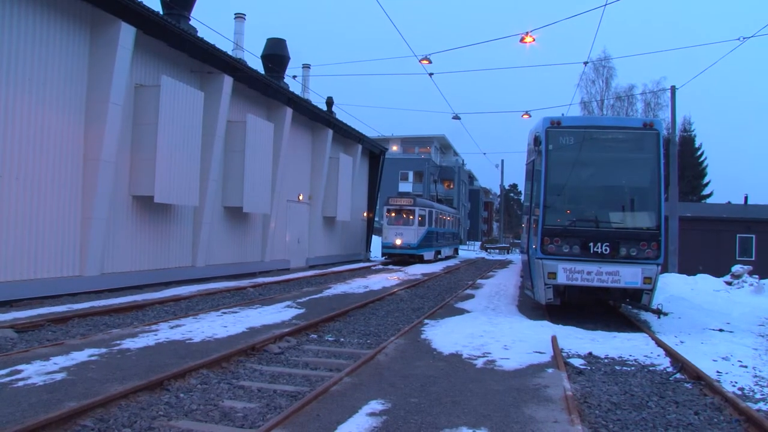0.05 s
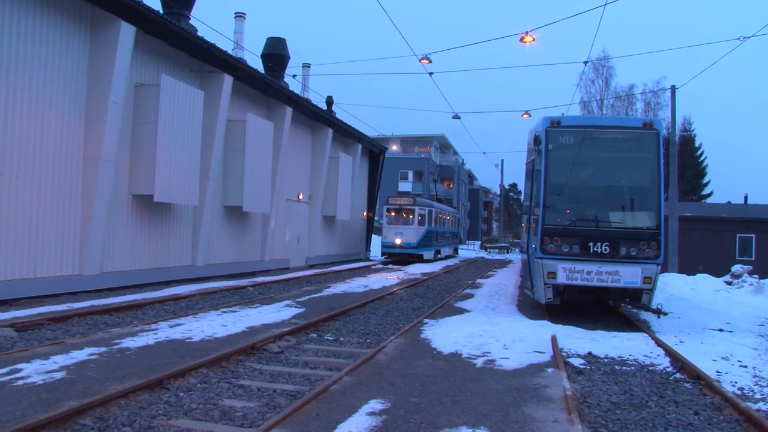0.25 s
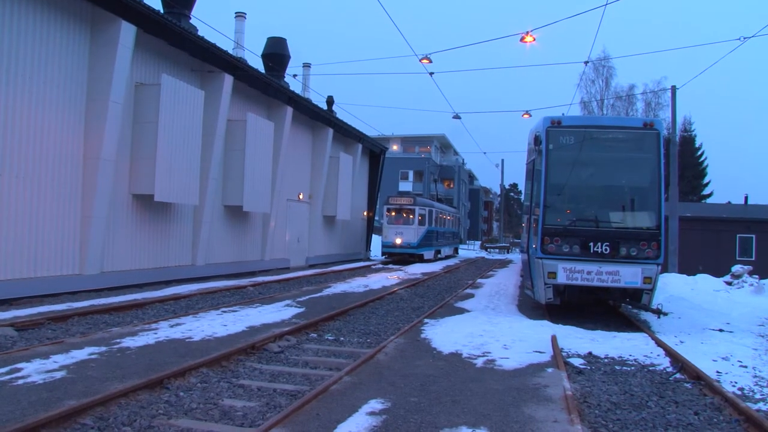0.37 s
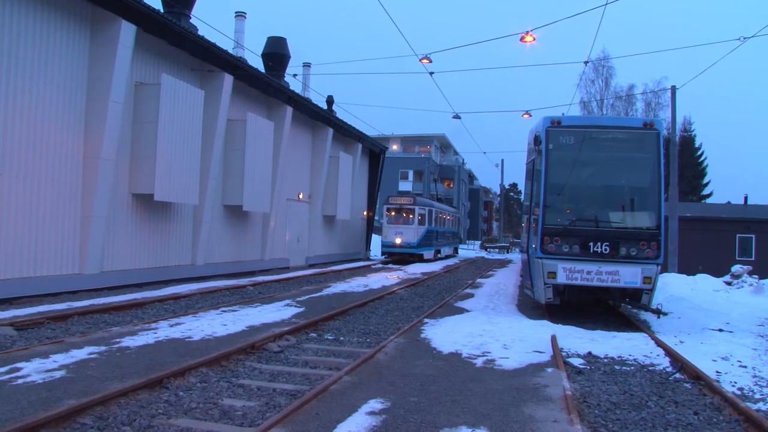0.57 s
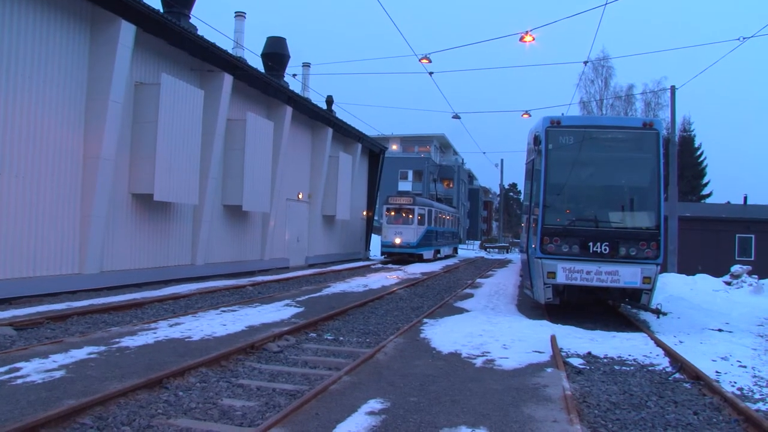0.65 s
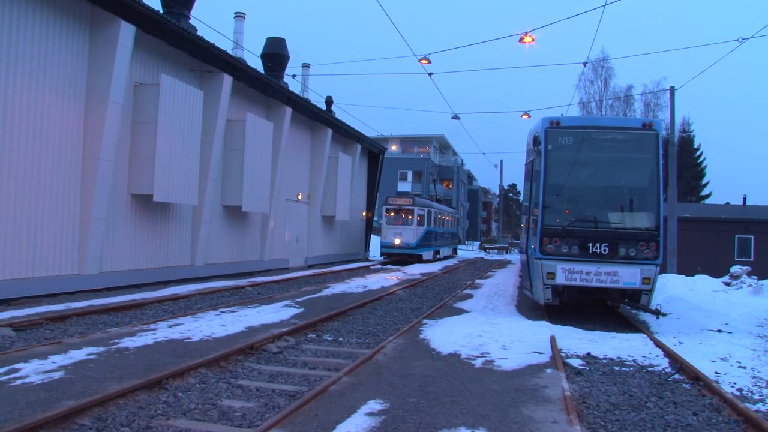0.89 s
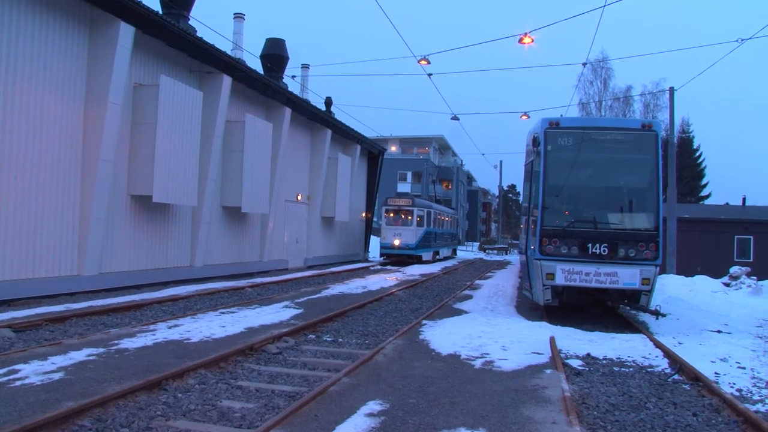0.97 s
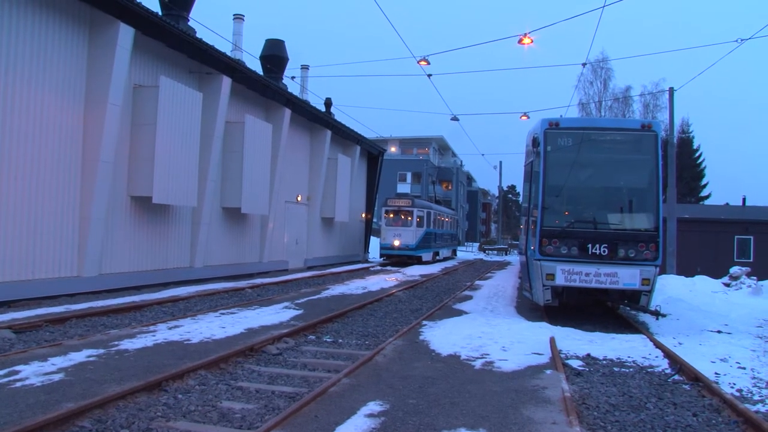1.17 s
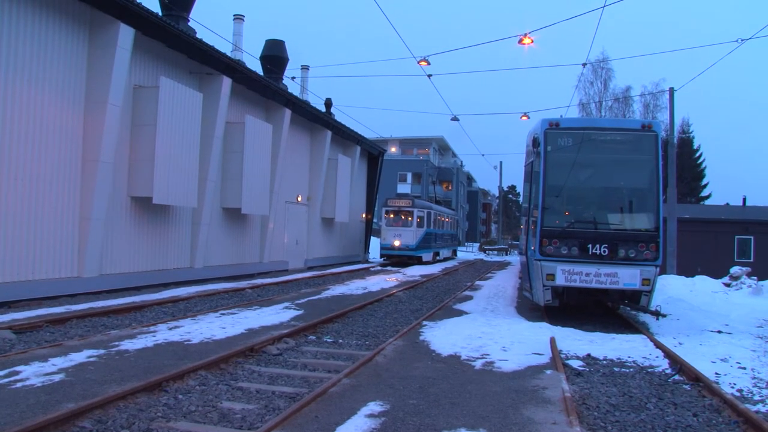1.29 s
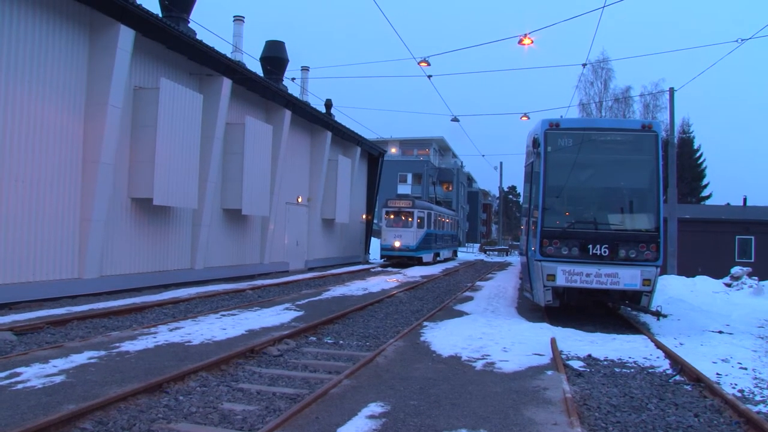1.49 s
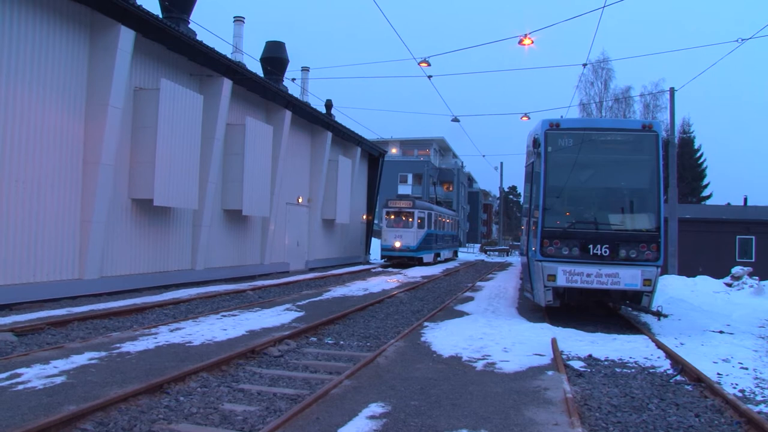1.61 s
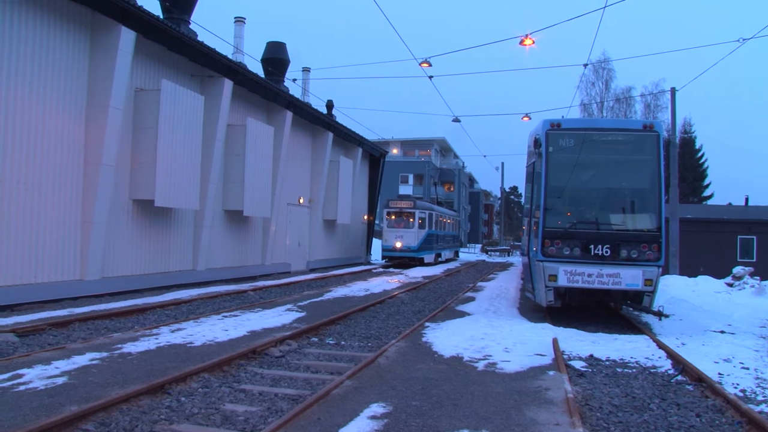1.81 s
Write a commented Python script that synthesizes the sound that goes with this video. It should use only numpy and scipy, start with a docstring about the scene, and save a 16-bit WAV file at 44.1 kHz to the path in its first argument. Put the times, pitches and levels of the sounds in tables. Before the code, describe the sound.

A tram's warning bell rings once, its clapper chattering briefly against the metal before the tone rings out. The bright clang scatters lightly around an open yard, over distant traffic, a low rumble and faint motor hum.

```python
"""A bright, rattling clang: a tram's warning bell rings once in an open yard. The clapper chatters against
the gong for a sixth of a second, then the gong rings out, its low partials longest.
The depot wall and the cars scatter the clang. Distant traffic, far motors, a low rumble
and a faint hiss lie underneath and swell a little."""
import sys
import numpy as np
from scipy import signal
from scipy.fft import rfft, irfft
from scipy.io import wavfile
from scipy.ndimage import uniform_filter1d

SR = 44100
rng = np.random.default_rng(int(sys.argv[2]) if len(sys.argv) > 2 else 0)


def bounce(signal):
    """Save signal as a 16-bit WAV file at the path given by the first command-line argument."""
    frames = np.transpose(np.atleast_2d(signal))
    limited = np.clip(frames, -1, 1)
    pcm = np.round(limited * 32767).astype(np.int16)
    wavfile.write(sys.argv[1], SR, pcm)


N = 81585

# clapper hits on the gong (time [s], strength [dB])
CLAPPER_HITS = [(.2325, -9.5), (.243, -4.5), (.251, -2.5), (.265, 1), (.272, -14), (.279, -4.5), (.287, 3),
                (.297, 3.5), (.305, 2), (.323, -2.5), (.329, 4.5), (.339, -4), (.349, -1.5), (.363, -0.5),
                (.372, 4), (.386, -4.5), (.403, -9.5)]
def clapper(rebounds_per_s=1800, rebound_db=-6, rebound_t60_s=.052):
    """The clapper hits and bounces: clicks for the blows alone, and for blows plus rebounds."""
    times, strength_db = np.transpose(CLAPPER_HITS)
    blows = np.zeros(N)
    blows[(times * SR).astype(int)] = from_db(strength_db)
    rebounds = (rng.random(N) < rebounds_per_s / SR) * rng.standard_normal(N)
    return blows, blows + from_db(rebound_db) * rebounds * stored(blows, rebound_t60_s)


# the gong's partials (pitch [Hz])
PARTIAL_HZ = [1654, 2345, 2356.5, 2457, 3135, 3153, 3998, 4025, 4046, 4741, 4786, 4944, 5979, 6257, 6425,
              6650, 7076, 7115, 8165, 8328, 8700, 9648, 10100, 11061, 11410, 11965, 12570, 12939, 13250,
              14175, 14825]
# their mix, in the same order (relative clang [dB], relative ring [dB], ring T60 [s], pan L-R [dB])
PARTIAL_MIX = [(-41, -47, 4.7, 9.5), (-32, -34.5, 0.39, 1), (-41.5, -26.5, 2.42, 3),
               (-51.5, -40.5, 0.63, -2), (-59.5, -45.5, 0.19, 5), (-56.5, -50.5, 1.99, 17.5),
               (-34, -47, 1, -12.5), (-28, -50, 1.1, -1), (-36.5, -46.5, .7, 15.5), (-43.5, -38, 0.33, 0.5),
               (-53, -53, 0.99, 14.5), (-27.5, -33, 0.58, -5), (-29.5, -49.5, 0.8, 3),
               (-30, -34, 0.45, -0.5), (-46.5, -52, .4, -4.5), (-51, -62, .4, -1), (-31, -49.5, 0.63, 3.5),
               (-45, -46, 0.29, 1), (-52.5, -47, 0.39, 1), (-48, -56, 0.69, -6), (-50, -59, .3, -3),
               (-48.5, -49.5, 0.16, 1), (-52, -75.5, 0.33, -6.5), (-57.5, -52.5, .3, 0),
               (-71, -53.5, 0.28, 6), (-69, -55.5, .27, 3), (-54, -68, .48, -13), (-56, -67.5, .29, -11.5),
               (-70.5, -67, .27, 0), (-66.5, -55, .25, -1), (-73, -75, .37, 4)]
def gong(blows, contacts, main_hz=2356, clang_t60_s=.17, kick_rad=.22, waver_db=.81):
    """Each mode clangs unevenly under the clapper, then rings on cleanly from its highest swing."""
    clangs, rings, t = 0, 0, np.arange(N) / SR
    swing = build_up(stored(contacts, clang_t60_s)) + 1e-12
    clang_gain = from_db(1.5) * np.sqrt(np.mean(swing ** 2) / 2)
    struck = np.cumsum(blows) > 0
    for hz, (clang_db, ring_db, t60, pan_db) in zip(PARTIAL_HZ, PARTIAL_MIX):
        clangs += pan(pan_db) * from_db(clang_db) * clang_gain * clang(contacts, swing, hz, clang_t60_s)
        decay = from_db(-60 * t / t60)
        rise = min(.52 * (hz / main_hz) ** .2, 1)   # low partials speak at once
        held = np.maximum.accumulate(build_up(struck * swing ** rise) / decay) * decay
        phase = 2 * np.pi * (hz * t + rng.random())
        phase += kick_rad * np.cumsum(blows * rng.standard_normal(N))   # each blow nudges the phase
        waver = waver_db * hz / main_hz * drift(6)   # high partials waver more
        tone = widen(np.sin(phase), np.cos(phase) * rng.choice([-1, 1]), hz)
        rings += pan(pan_db) * from_db(ring_db + 1 + waver) * held * tone
    return clangs, rings


def clang(contacts, swing, hz, t60, evenness=.76, window_s=.013):
    """One mode kicked by every contact; the clapper limits its swing, evening out the level."""
    mid, side = [rms_one(ring(contacts * rng.choice([-1, 1], N), hz, t60)) for _ in range(2)]
    power = uniform_filter1d(mid ** 2, int(window_s * SR))
    swell = np.sqrt(np.abs(power) + 1e-12)
    return rms_one(widen(mid, side, hz) * (swing / swell) ** evenness)


# tone colour of the metallic crash (frequency [Hz], level [dB])
RATTLE_EQ = [(1200, -13.5), (1700, -23.5), (2400, 5), (3200, -13), (4000, -5), (5300, -20), (6500, 3.5),
             (7600, -5), (9200, -29), (13000, -29.5), (15500, -25.5)]
def rattle(contacts, peak_db=-30, t60_s=.07):
    """Countless short-lived modes of clapper and mounting: a crash at each contact."""
    (mid, side), hz = coloured(RATTLE_EQ)
    metal = rms_one(irfft(widen(mid, side, hz), N))
    return from_db(peak_db) * build_up(stored(contacts, t60_s)) * metal


# stereo width of the bell (frequency [Hz], side gain [ratio])
BELL_SPREAD = [(1600, 0.17), (2400, 0.18), (5000, 0.3), (9000, .16)]
def widen(mid, side, hz):
    """Left and right of the bell, a narrow image."""
    return mid + at_hz(BELL_SPREAD, hz) * side * np.array([[1], [-1]])


def yard(strike, send_db=-8.5, t60_s=.41, onset_s=.0059):
    """Scatter from walls and cars: a short diffuse tail, duller than the bell."""
    t = np.arange(N) / SR
    (mid, side), hz = coloured([(500, 7.5), (6000, -5.5), (15000, -5.5)])
    envelope = from_db(-60 * t / t60_s) * (1 - np.exp(-t / onset_s))
    tail = irfft(widen(mid, 2 * side, hz), N) * envelope
    tail /= np.sqrt(np.sum(tail ** 2) / 2)
    return from_db(send_db) * signal.fftconvolve(strike, tail, axes=1)[:, :N]


# midrange wash of traffic (frequency [Hz], level [dB])
TRAFFIC_EQ = [(250, -4.5), (350, -7), (480, -5), (700, -3.5), (950, 1), (1200, -2), (1550, -1.5),
              (1900, -14.5), (2600, -18), (3400, -32)]
# its slow swell (time [s], level [dB])
TRAFFIC_FADER = [(0, -50), (.25, -47.5), (0.599, -47.5), (1.1, -46.5), (1.5, -46.5), (1.85, -45.5)]
def traffic():
    """Distant traffic blurs into a gently rising wash."""
    return noise_bed(TRAFFIC_EQ, TRAFFIC_FADER, flutter_db=.3)


# deep rumble (frequency [Hz], level [dB])
RUMBLE_EQ = [(18, -11.5), (30, -6.5), (42, 1.5), (62, 1.5), (110, -4)]
# its ebb and return (time [s], level [dB])
RUMBLE_FADER = [(0, -50.5), (.33, -51.5), (.55, -57), (1, -54.5), (1.5, -51.5), (1.85, -58)]
# drone above the rumble (frequency [Hz], level [dB])
DRONE_EQ = [(100, -5), (140, -3), (185, 1.5), (265, -4.5), (380, -13)]
# its two swells (time [s], level [dB])
DRONE_FADER = [(0, -53.5), (.4, -54), (.7, -52), (.9, -48), (1.2, -52), (1.5, -49), (1.85, -50)]
def low_end():
    """A rumble and a noisy drone, each swelling in its own time."""
    rumble = noise_bed(RUMBLE_EQ, RUMBLE_FADER, flutter_db=.6)
    return rumble + noise_bed(DRONE_EQ, DRONE_FADER, flutter_db=-.03)


# a motor's hum fading in (time [s], level [dB])
HUM_FADER = [(0, -74), (1.3, -52.5), (1.55, -55.5), (1.85, -52)]
def far_motors(hum_hz=139.8, whine_hz=1007.6, whine_db=-61, wander_hz=2.3):
    """Far motors hum and faintly whine, unsteady in pitch and level."""
    tones = 0
    for hz, db in [(hum_hz, in_time(HUM_FADER)), (whine_hz, whine_db)]:
        phase = 2 * np.pi * np.cumsum(hz + wander_hz * drift(4.3)) / SR
        gain = np.sqrt(2) * from_db(db + 1.5 * drift(8))
        tones += pan(at_hz(BED_PAN, hz)) * gain * np.sin(phase)
    return tones


# airy top end (frequency [Hz], level [dB])
HISS_EQ = [(3000, -1.5), (4000, 2), (5000, 3.5), (6700, 2), (9000, -8.5), (12000, -12.5), (15000, -31.5)]
# its slight rise and fall (time [s], level [dB])
HISS_FADER = [(0, -70.5), (.7, -72.5), (1.1, -73.5), (1.321, -71.5), (1.45, -70), (1.598, -70),
              (1.7, -72.5), (1.85, -74)]
def hiss():
    """A faint hiss behind everything else."""
    return noise_bed(HISS_EQ, HISS_FADER, flutter_db=-.06)


# how centred the ambience is (frequency [Hz], left-right correlation [0-1])
BED_CORRELATION = [(30, 0.71), (120, 1), (300, 0.8), (600, 0.53), (850, 0.85), (1150, 0.36), (1500, 0.56),
                   (3000, 0.33), (6000, 0.84), (11000, 0.68)]
# where the ambience leans (frequency [Hz], pan L-R [dB])
BED_PAN = [(60, -4.5), (120, -4.5), (240, -3), (480, -2), (950, 1.0), (1890, 2.0), (3770, -1.5), (7520, 1),
           (15000, 0.0)]
def noise_bed(eq, fader, flutter_db):
    """Wide outdoor noise on a level curve, gently uneven."""
    (mid, side), hz = coloured(eq)
    alike = at_hz(BED_CORRELATION, hz)
    stereo = np.sqrt(1 + alike) * mid + np.sqrt(1 - alike) * side * [[1], [-1]]
    noise = rms_one(irfft(stereo * pan(at_hz(BED_PAN, hz)), N))
    return noise * from_db(in_time(fader) + flutter_db * drift(3.9))


def coloured(eq):
    """Spectra of two unrelated noises, falling steeply beyond the EQ's ends, and their frequencies."""
    hz = np.maximum(np.arange(N // 2 + 1) * SR / N, 1)
    roll_off = np.minimum(1, np.minimum(hz / eq[0][0], eq[-1][0] / hz)) ** 4
    return rfft(rng.standard_normal((2, N))) * from_db(at_hz(eq, hz)) * roll_off, hz


def ring(clicks, hz, t60):
    """A click sets a dying sine ringing."""
    r, w = from_db(-60 / (t60 * SR)), 2 * np.pi * hz / SR
    return signal.lfilter([0, np.sin(w)], [1, -2 * r * np.cos(w), r * r], clicks + 1e-18)


def stored(clicks, t60):
    """Amplitude of a leaking store of energy that each click fills; peaks at 1."""
    retained = from_db(-60 / (t60 * SR)) ** 2
    energy = signal.lfilter([1], [1, -retained], clicks ** 2 + 1e-24)
    return np.sqrt(energy / energy.max())


def build_up(x, contact_s=.005):
    """Round off each attack over the contact time."""
    r = np.exp(-1 / (contact_s * SR))
    return signal.lfilter([1 - r], [1, -r], x)


def drift(rate_hz, hop=40):
    """Slow random wander at unit power."""
    r = np.exp(-2 * np.pi * rate_hz * hop / SR)
    slow = signal.lfilter([1], [1, -2 * r, r * r], rng.standard_normal(N // hop + 2002))[2000:]
    return np.interp(np.arange(N) / hop, np.arange(len(slow)), rms_one(slow))


def from_db(db):
    """Decibels to gain."""
    return 10 ** (np.asarray(db) / 20)


def rms_one(x):
    """Scale to unit power."""
    return x / np.sqrt(np.mean(x ** 2) + 1e-20)


def in_time(rows):
    """Read a fader curve at every sample."""
    return np.interp(np.arange(N) / SR, *np.transpose(rows))


def at_hz(rows, hz):
    """Read a table on a log-frequency axis."""
    freqs, values = np.transpose(rows)
    return np.interp(np.log(hz), np.log(freqs), values)


def pan(db):
    """Left and right gains for a level difference."""
    return from_db(np.array([[.5], [-.5]]) * db)


def scene():
    """The bell and its scatter in the yard, over the distant ambience."""
    blows, contacts = clapper()
    clangs, rings = gong(blows, contacts)
    strike = clangs + rattle(contacts)
    ambience = low_end() + traffic() + hiss() + far_motors()
    return strike + rings + yard(strike) + ambience


# the treble gathers in the middle (frequency [Hz], side level [dB])
SIDE_EQ = [(5500, -3), (8500, -5.5), (12000, -22), (15000, -29)]
def record(dry):
    """The stereo image narrows, most in the treble, and the top is cut."""
    mid, side = (dry[0] + dry[1]) / 2, (dry[0] - dry[1]) / 2
    hz = np.maximum(np.arange(N // 2 + 1) * SR / N, 1)
    side = irfft(rfft(side) * from_db(at_hz(SIDE_EQ, hz)), N)
    high_cut = signal.cheby2(16, 70, 15900, fs=SR, output="sos")
    return signal.sosfilt(high_cut, np.array([mid + side, mid - side]))


dry = scene()
out = record(dry)
bounce(out)
```